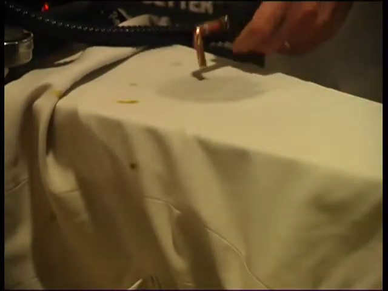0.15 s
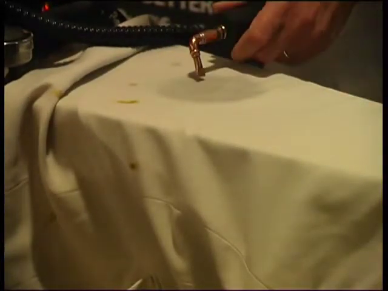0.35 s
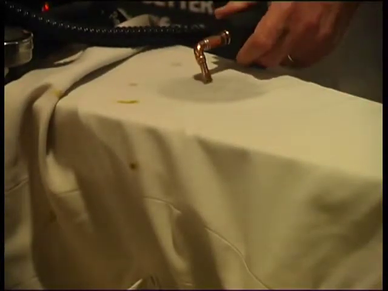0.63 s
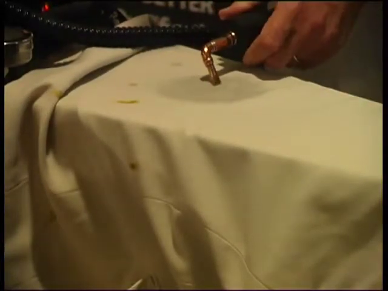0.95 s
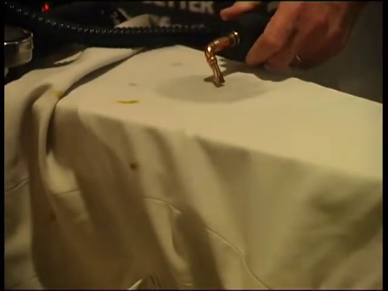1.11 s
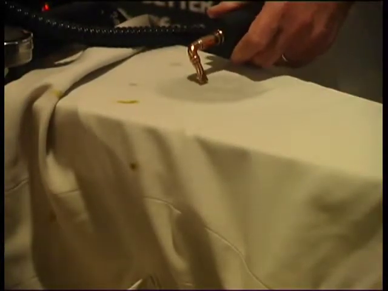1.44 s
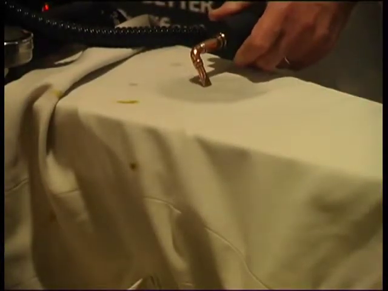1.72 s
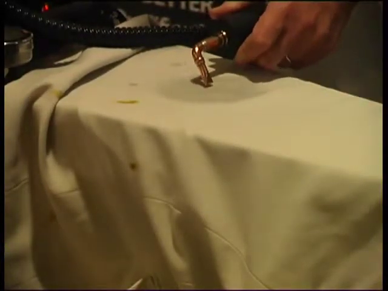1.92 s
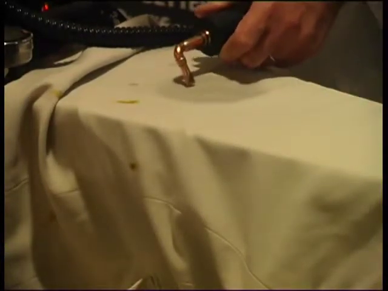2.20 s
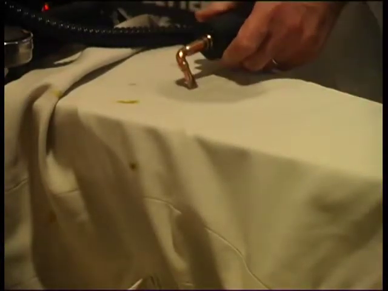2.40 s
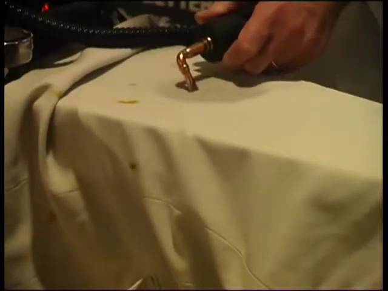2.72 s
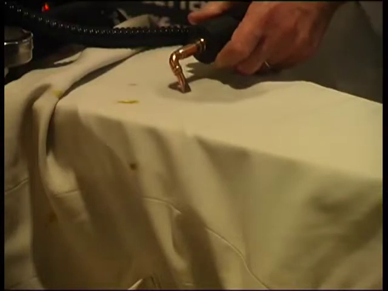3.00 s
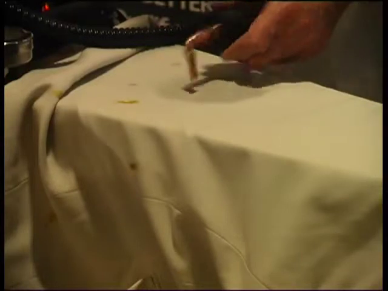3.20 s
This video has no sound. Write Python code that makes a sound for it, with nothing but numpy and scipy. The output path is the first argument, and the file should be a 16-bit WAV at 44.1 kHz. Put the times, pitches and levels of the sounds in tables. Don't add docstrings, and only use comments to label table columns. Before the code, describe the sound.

A steam gun hisses continuously, sharp and very bright, over cloth in a workshop. It starts weaker, surges by 0.2 seconds, dips abruptly near 0.55, and returns strongly by 0.75. It then wavers with the strokes, softer around 1.8 and 2.3, with brief swells near 2 and 3.1, easing at 3.3. Underneath run dull fabric rush, steady 50-hertz buzz, thin high whine and faint rumble.

```python
import sys
import numpy as np
from scipy import signal
from scipy.fft import rfft, irfft
from scipy.io import wavfile
from scipy.ndimage import uniform_filter1d

SR = 44100
rng = np.random.default_rng(int(sys.argv[2]) if len(sys.argv) > 2 else 0)


def rack_gain(trim_db):
    fader = np.asarray(trim_db, float)
    return 10 ** (fader / 20)


def generate_wav(signal):
    frames = np.transpose(np.atleast_2d(signal))
    scaled = np.clip(frames, -1, 1) * 32767
    pcm = np.round(scaled).astype(np.int16)
    wavfile.write(sys.argv[1], SR, pcm)


N = 147735


def walk(rate):
    hold = int(SR / rate)
    steps = np.repeat(rng.standard_normal(N // hold + 1), hold)
    return 1.7 * uniform_filter1d(uniform_filter1d(steps, hold), hold)[:N]


def colour(table, hz):
    table = np.array(table)
    return np.interp(np.log(hz), np.log(table[:, 0]), table[:, 1])


def shaped(x, gain):
    return irfft(rfft(x) * gain(np.arange(N // 2 + 1) * SR / N + 1), N)


def level(x, db):
    return x * rack_gain(db) / np.std(x)


# (start_s, level_db)
JET_LEVEL = [(0, -41.5), (.21, -34.5), (.3, -36), (.55, -36), (.575, -41.5), (.74, -34), (1.04, -35),
             (1.25, -35.5), (1.42, -34), (1.56, -36.5), (1.84, -38), (1.95, -33), (2.11, -34.5),
             (2.26, -34), (2.29, -38), (2.9, -35), (3.11, -33.5), (3.35, -39)]
# (middle_s, change_db taken off the level, negative lifts it,
# length_s)
TURNS = [(.54, -6.5, 0.0089), (0.512, -1, 0.023), (1.183, -2, .03), (0.601, 1, 0.043), (0.907, 4, 0.057),
         (.98, 4, 0.074), (1.579, 4.5, 0.12), (1.804, 2.5, 0.053), (2.33, 3.5, 0.054), (2.66, 4.5, 0.12),
         (2.994, 5.5, 0.083), (3.072, 7, 0.06)]
# (start_s, angle toward the microphone -1..1, scrub on the cloth -1..1)
AIM = [(0, -.3, -.5), (.13, -.1, -.1), (.24, 1, 0), (.5, .5, 1), (.6, .2, -.5), (.75, .2, .8),
       (.9, .1, -.1), (1.08, 0, .6), (1.18, .6, .1), (1.47, -.3, 0), (1.95, -.2, .1), (2.28, -.9, -.2),
       (2.5, -.3, 0), (2.72, .5, 0), (2.88, .2, 0), (3., -.4, -.1), (3.13, .1, .3), (3.35, -.1, 0)]


def hand_movement():
    t = np.arange(N) / SR
    db = np.interp(t, *np.array(JET_LEVEL).T)
    for middle, change_db, length in TURNS:
        db = db - change_db * np.exp(-((t - middle) / (length / 2)) ** 2)
    aim_s, angle, scrub = np.array(AIM).T
    return db, np.interp(t, aim_s, angle), np.interp(t, aim_s, scrub)


# (pitch_hz, level_db)
JET_COLOUR = [(1200, -50), (2000, -27), (3000, -17.5), (4500, -12), (6000, -12), (9000, -8.5),
              (12300, -4.8), (15700, -3)]
# (pitch_hz, width_hz, level_db, change_db per unit of angle)
RINGS = [
    (10480, 620, 4.3, 3.5),
    (13480, 750, 3.2, 0),
    (11580, 420, -3.5, -2),
    (5100, 900, .8, 2),
]


def jet(db, angle, scrub):
    spits_per_s, spit_db, spit_spread_db = 2500, -12, 2
    sputter_db, sputter_per_s, flicker_db, drift_db = .5, 60, .8, .6
    depth_at_3k, tilt_db_per_octave = .43, -.6
    scrub_db, scrub_below_hz = 1.5, 6500

    droplets = (rng.random(N) < spits_per_s / SR) * rng.standard_normal(N)
    droplets = droplets * rack_gain(spit_spread_db * rng.exponential(size=N))
    air = rng.standard_normal(N) + level(droplets, spit_db)
    air = air * rack_gain(sputter_db * walk(sputter_per_s))

    f = np.arange(N // 2 + 1) * SR / N + 1
    tone_db = colour(JET_COLOUR, f) + sum(g * np.exp(-((f - c) / w) ** 2) for c, w, g, _ in RINGS)
    spectrum = rfft(air) * rack_gain(tone_db)

    drifts = [walk(5.27) for _ in range(9)]
    out, swing_db = 0, db - db.mean()
    for k, hz in enumerate(1500 * 2 ** (np.arange(29) / 8)):
        window = np.cos(np.pi / 2 * np.clip(8 * np.log2(f / hz), -1, 1)) ** 2
        band = irfft(spectrum * window, N)
        ring_db = sum(a * angle * np.exp(-((hz - c) / w) ** 2 / 2) for c, w, _, a in RINGS)
        depth = depth_at_3k + (1 - depth_at_3k) * np.log(hz / 3000) / np.log(4)
        tilt_db = tilt_db_per_octave * angle * np.log2(hz / 10000)
        tilt_db = tilt_db + scrub_db * scrub * np.clip(np.log2(scrub_below_hz / hz), 0, 1)
        group, part = divmod(k, 4)
        drift = (drifts[group] * (4 - part) + drifts[group + 1] * part) / 4
        own_db = flicker_db * walk(14) + drift_db * drift
        out = out + band * rack_gain(depth * swing_db + ring_db + tilt_db + own_db)
    return level(out, 10 * np.log10(np.mean(rack_gain(2 * db))))


# (pitch_hz, level_db per Hz)
CLOTH_COLOUR = [(150, -6.5), (400, -6), (750, -1), (1200, -3), (1750, -1), (2100, -7.5), (3000, -13)]


def cloth(db, scrub):
    cloth_db, follows_jet, scrub_db = -57, .29, 3
    tone = [(22, -40), *CLOTH_COLOUR, (9000, -49)]
    rush = level(shaped(rng.standard_normal(N), lambda f: rack_gain(colour(tone, f))), cloth_db)
    return rush * rack_gain(follows_jet * (db - db.mean()) + scrub_db * scrub + .5 * walk(12.37))


# (pitch_hz, level_db per Hz)
SHOP_COLOUR = [(20, -9.5), (62, 5.5), (85, -3.5), (120, -6.5), (250, -9.5), (500, -17.5), (1500, -33)]


def shop():
    tone = [(3.4, -15), *SHOP_COLOUR, (8000, -55)]
    return level(shaped(rng.standard_normal(N), lambda f: rack_gain(colour(tone, f))), -60)


# (time_ms, level in thousandths)
PICTURE = [(0, 2.6), (1.85, 2.8), (2.5, 4.3), (3.5, 5), (4.5, 4.6), (4.9, 1.2), (6, 0), (8, -7.5),
           (8.3, -10), (11.5, -5.8), (12.4, -1.7), (15, 1.8), (18.5, 2.5), (20, 2)]


def picture_leak():
    field_hz, field_start_s, line_hz, clock_hz = 50, .0154, 15625, 8000
    blank_ms, blank, sync_at_ms, sync_ms, sync = 1.72, 4.2, .33, .13, 8.5
    frame_step, frame_ramp = .3, 2.2
    hand_ms, hand_width_ms, hand_size = 10.3, 1.1, 3
    buzz_db, whistle_db, whistle_depth, clock_db = 0, -52, .7, -64.5
    wobble_rad, wobble_ms = .4, 9.5

    t = np.arange(N) / SR
    fields = (t - field_start_s) * field_hz
    ms = fields % 1 * 1000 / field_hz
    odd = 1 - 2 * (np.floor(fields) % 2)

    hand = hand_size * (t / t[-1] - .5) * np.exp(-((ms - hand_ms) / hand_width_ms) ** 2)
    bright = np.interp(ms, *np.array(PICTURE).T) + hand
    blanking = ms < blank_ms
    tick = sync * np.exp(-((ms - sync_at_ms) / sync_ms) ** 2)
    buzz = bright + blank * blanking + tick + odd * (frame_step + frame_ramp * ms / 20)
    buzz = uniform_filter1d(buzz - buzz.mean(), size=5) * rack_gain(buzz_db) / 1000

    swing = 1 - whistle_depth * bright / 10 - .5 * blanking
    wobble = wobble_rad * np.sin(2 * np.pi * field_hz * (ms - wobble_ms) / 1000)
    whistle = rack_gain(whistle_db) * swing * np.sin(2 * np.pi * line_hz * t - wobble)
    clock = rack_gain(clock_db) * np.sin(2 * np.pi * clock_hz * t)
    return buzz + np.sqrt(2) * (whistle + clock)


# (middle_s, pitch_hz, level_db)
SLIPS = [(.03, 5760, -56), (.12, 5100, -52), (.12, 11600, -53), (.19, 7700, -49), (1.145, 4620, -55),
         (1.145, 10300, -47), (1.165, 15200, -47), (2.14, 5160, -55), (2.14, 14400, -46),
         (2.675, 14000, -48), (2.675, 7540, -54), (2.675, 2300, -81), (3.3, 4800, -55)]
# (start_s, end_s)
LOW_SLIP_SPANS = [(0, .24), (.57, .73), (.95, 1.03), (1.15, 1.45), (1.52, 1.97), (2.1, 2.5), (2.55, 3.35)]


def slips():
    low_slips, low_hz, high_hz, low_slip_db = 80, 280, 750, -88
    slip_s, half_width_octaves = .04, .11

    low = []
    for when, pitch, loudness in rng.random((low_slips, 3)):
        s = when * N / SR
        if any(a < s < b for a, b in LOW_SLIP_SPANS):
            low.append((s, low_hz * (high_hz / low_hz) ** pitch, low_slip_db + 5 * loudness))

    size = int(slip_s * SR)
    out = np.zeros(N + 2 * size)
    f = np.arange(size // 2 + 1) * SR / size + 1
    fade = np.sin(np.pi * np.arange(size) / size)
    for s, hz, db in [*SLIPS, *low]:
        in_band = np.abs(np.log2(f / hz)) < half_width_octaves
        puff = irfft(rfft(rng.standard_normal(size)) * in_band, size)
        start = int(s * SR)
        out[start:start + size] += level(puff, db) * fade
    return out[size // 2:size // 2 + N]


def scene():
    db, angle, scrub = hand_movement()
    mono = jet(db, angle, scrub) + cloth(db, scrub) + shop() + picture_leak()
    return np.tile(mono, (2, 1))


def band_limit(x):
    return signal.sosfilt(signal.butter(12, 16900, fs=SR, output="sos"), x)


def record(dry):
    wide = dry + slips() * np.array([[1], [-1]])
    mix = np.array([shaped(x, lambda f: f < 15740) for x in wide])
    return band_limit(mix)


dry = scene()
out = record(dry)
generate_wav(out)
```